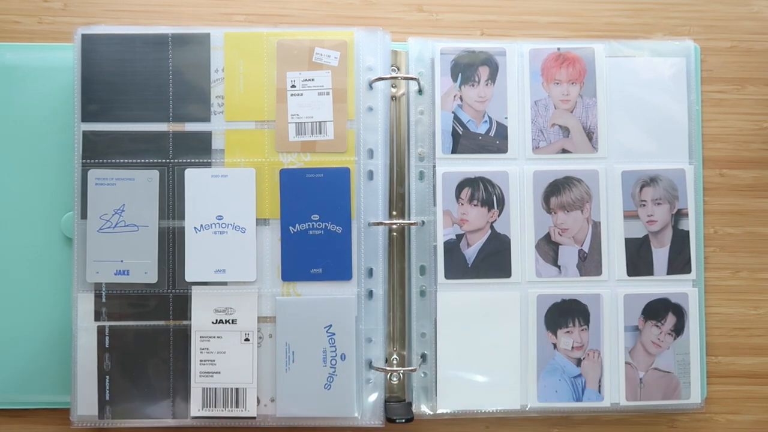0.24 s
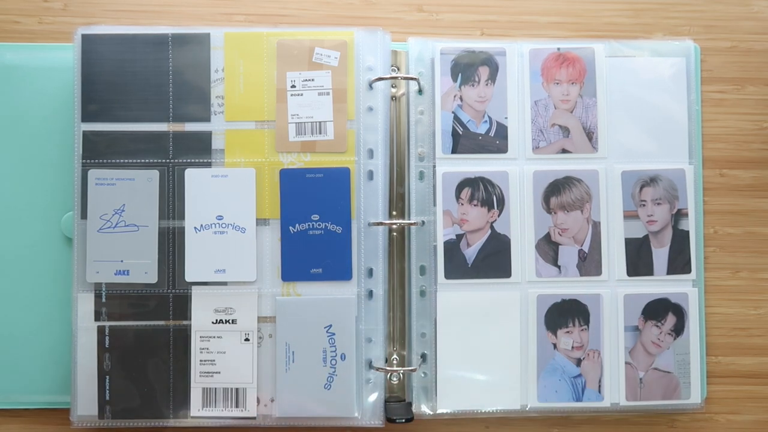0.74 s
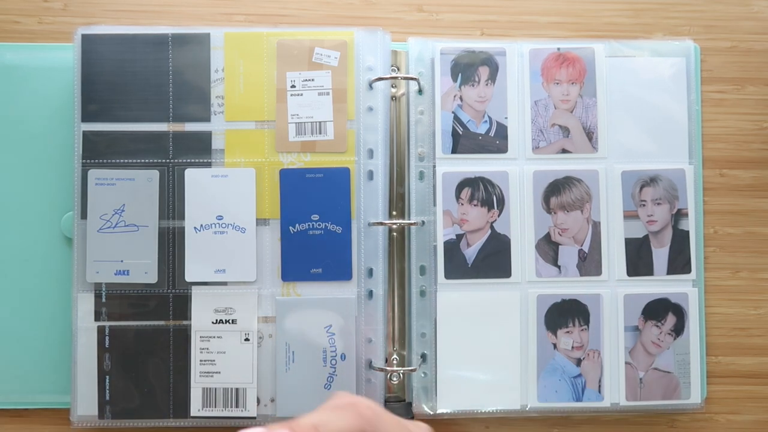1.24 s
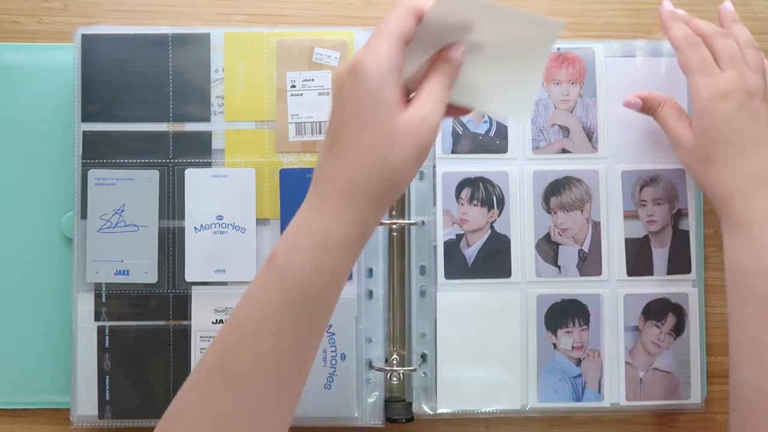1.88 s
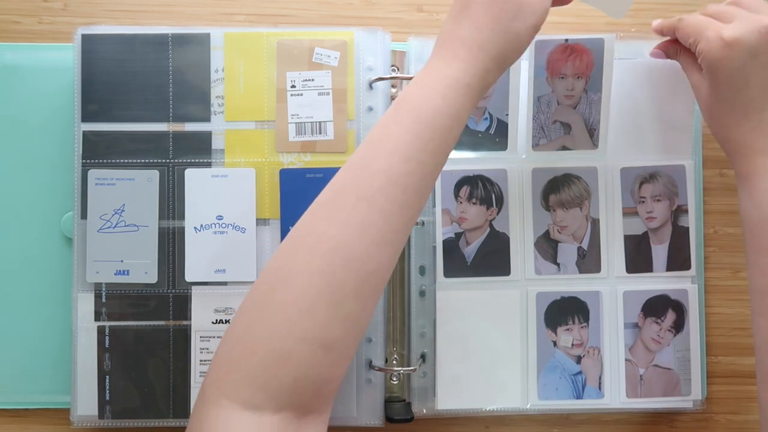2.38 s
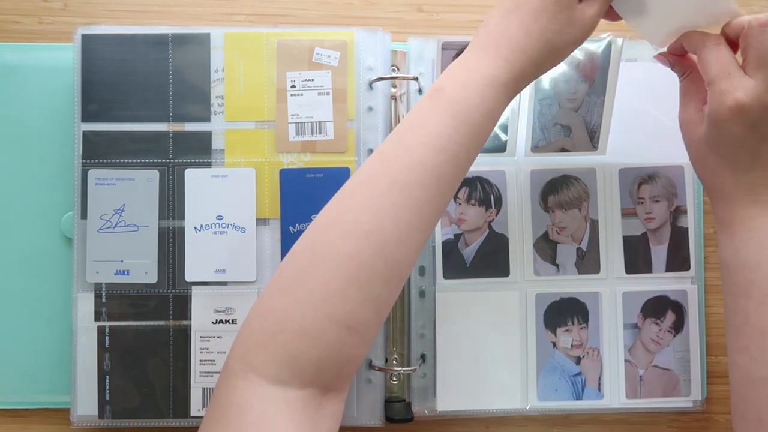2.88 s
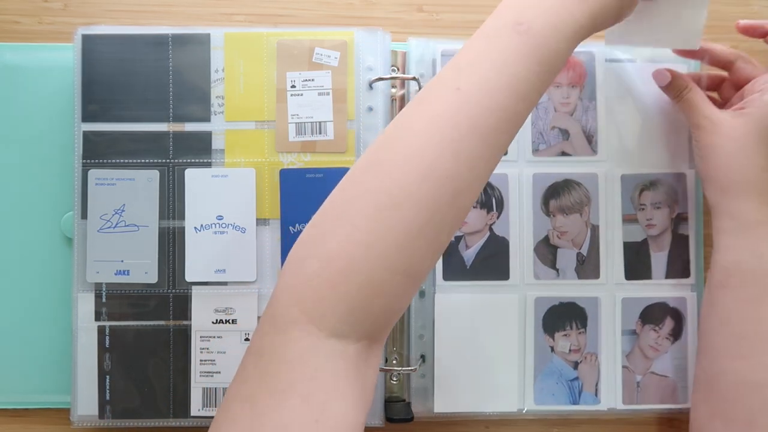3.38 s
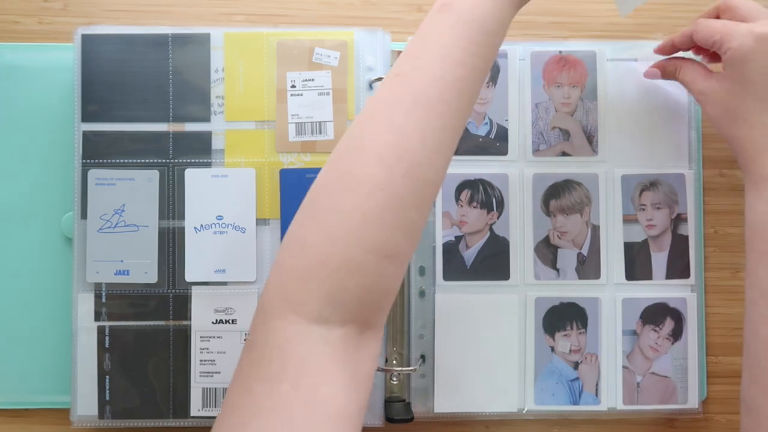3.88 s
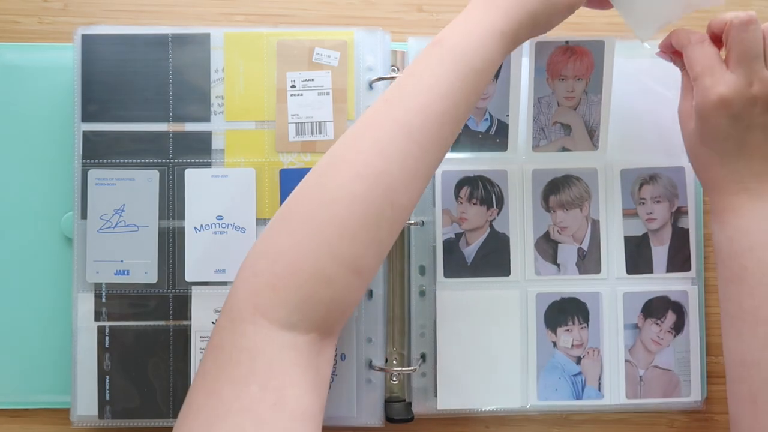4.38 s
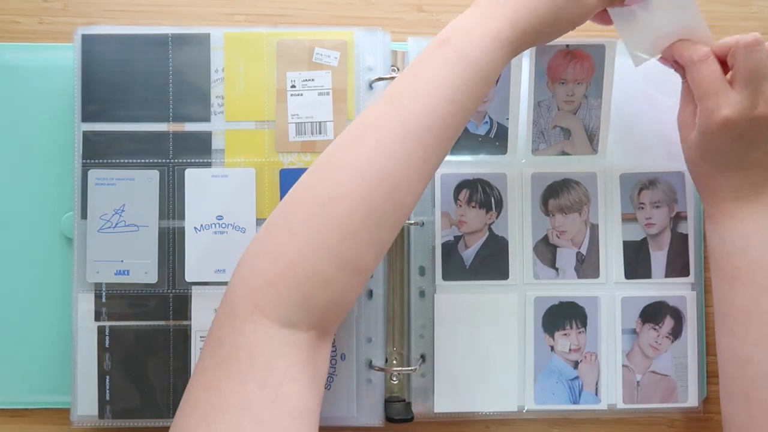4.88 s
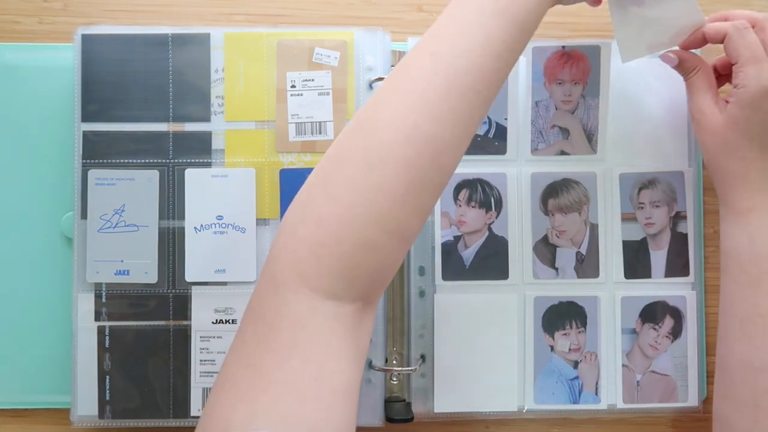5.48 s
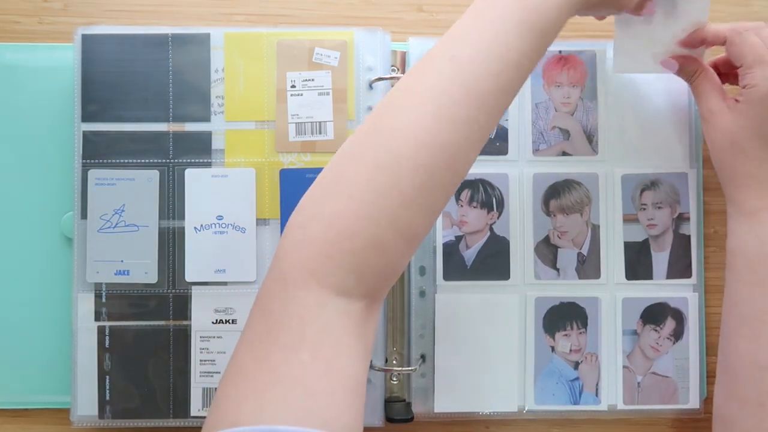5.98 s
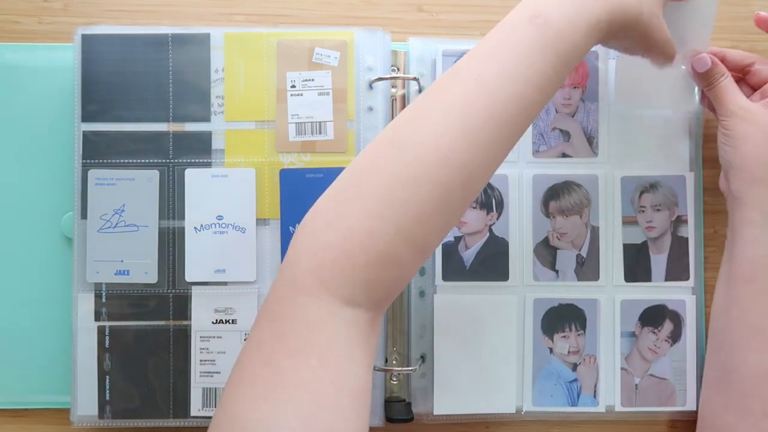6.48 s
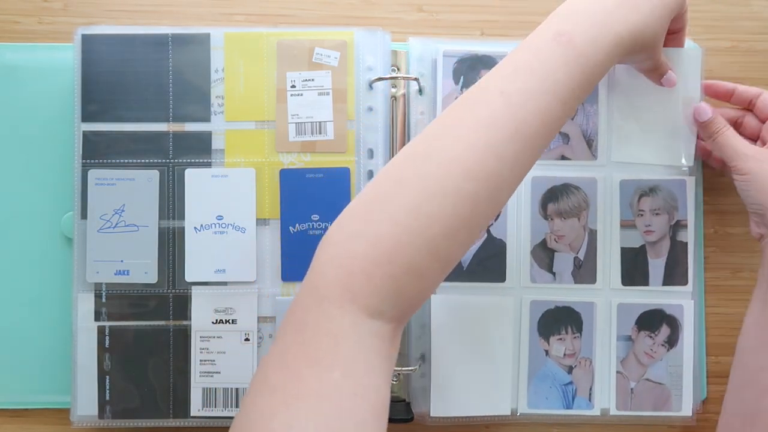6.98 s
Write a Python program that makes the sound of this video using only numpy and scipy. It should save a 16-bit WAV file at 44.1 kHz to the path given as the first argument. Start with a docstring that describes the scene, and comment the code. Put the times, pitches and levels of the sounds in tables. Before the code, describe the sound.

Thin plastic binder pages crackle busily up close, then a card slips into a pocket with sparse snaps, ticks and soft rustles.

```python
"""Clear plastic pages handled on a desk

A sleeve of a plastic binder page crinkles close to a phone, then a card is worked into a pocket.
Creases release as impulses that ring film panels, filtered impulse trains make the crackle and sliding hiss,
and larger buckles are short decaying tones with noise. The desk booms, a small room answers with decaying
noise, and an appliance hums far off as narrow noise bands under steady air noise."""
import sys
import numpy as np
from scipy import signal
from scipy.fft import rfft, irfft, next_fast_len
from scipy.io import wavfile
from scipy.ndimage import uniform_filter1d, map_coordinates

SR = 44100
rng = np.random.default_rng(int(sys.argv[2]) if len(sys.argv) > 2 else 0)


def wrap_up_sound(samples):
    """Save the sound to the file named by the first command line argument, as 16-bit audio."""
    columns = np.atleast_2d(samples).T
    # keep every value between -1 and 1, then stretch to whole-number steps
    tamed = np.clip(columns, -1, 1)
    steps = np.round(tamed * 32767).astype(np.int16)
    wavfile.write(sys.argv[1], SR, steps)


N = 319284  # length in samples

# Rustles, one pull or push of the film each. Each row: peak time in seconds, rise in seconds,
# fall in seconds, then relative levels of crackle, sliding hiss and page flex in dB.
RUSTLES = [(0.081, 0.0075, 0.076, -33.5, -65, -31), (.23, 0.11, 0.085, -45.5, -73, -52),
           (.339, 0.02, 0.15, -28.5, -57, -38), (.4, 0.099, 0.097, -50, -44.5, -42),
           (.47, 0.037, 0.082, -31, -47, -28.5), (0.607, 0.014, 0.023, -35.5, -64, -41),
           (0.863, 0.11, 0.16, -27.5, -41, -45), (.9, 0.052, 0.047, -32, -59, -49),
           (0.992, 0.075, 0.059, -21.5, -32.5, -38.5), (1.09, 0.024, 0.033, -39.5, -48, -45),
           (1.2, 0.0057, 0.048, -38, -40, -53), (1.247, 0.033, 0.051, -49, -58, -29),
           (2.17, 0.17, 0.047, -51, -54, -54), (2.3, 0.027, 0.066, -58, -56, -67),
           (2.359, 0.032, 0.14, -43.5, -47, -54.5), (2.49, 0.07, 0.052, -48.5, -46.5, -54),
           (2.63, 0.091, 0.15, -53.5, -61, -60), (3.018, 0.081, 0.081, -47, -56.5, -50.5),
           (3.333, 0.027, 0.06, -32.5, -46.5, -38), (3.41, .1, 0.072, -52, -66, -59.5),
           (3.55, 0.044, 0.064, -36.5, -41.5, -39.5), (4.11, 0.23, 0.11, -50.5, -55.5, -62),
           (4.329, 0.038, 0.054, -45.5, -47, -48), (4.585, 0.049, 0.1, -48.5, -60, -66),
           (4.66, 0.048, 0.043, -56, -54.5, -68), (4.93, 0.057, 0.11, -43.5, -53.5, -69),
           (5.08, 0.098, 0.12, -49.5, -79, -58), (6.055, 0.071, 0.087, -44, -48, -66),
           (6.175, 0.023, 0.24, -42.5, -75, -51), (6.42, 0.25, 0.27, -54, -70, -55),
           (6.67, 0.19, 0.11, -46.5, -54.5, -53), (6.78, 0.046, 0.25, -46.5, -49.5, -62),
           (7.04, 0.1, 0.19, -51, -51, -59)]
SWING_DB = 20  # a rustle climbs this far in its rise time and sinks this far in its fall time
# How busy the fingers are between rustles; low while the card is held still, high while it slides in.
# Each row: time in seconds, relative crackle level in dB.
BUSY = [(0, -58), (.06, -59), (.25, -60), (.7, -48), (1.17, -61), (1.42, -63.5), (1.7, -55), (2.2, -59.5),
        (2.9, -60), (3.2, -54), (3.7, -53.5), (4.2, -60), (4.85, -61), (5.2, -56), (5.5, -57),
        (5.91, -60.5), (6.2, -48.5), (6.6, -49), (6.92, -62), (7.24, -61.5)]
QUIET_DB = -60  # reference crackle level
BUSY_HISS_DB, BUSY_FLEX_DB = -68, -66.5  # hiss and flex when the crackle is at the reference
HISS_GROWS, FLEX_GROWS = 0.84, 0.99  # dB gained for each dB of crackle

# Panels of the film that ring when a crease gives way.
# Each row: frequency in Hz, bandwidth in Hz, relative level in dB.
PANELS = [(470, 170, -17), (921, 74, 0), (1280, 200, -7), (1643, 130, -5), (1966, 150, -4),
          (2150, 140, -6.5), (3040, 230, -18)]
# The pitch that the bent film favours; panels near it or near the upper ring sound loudest.
# Each row: time in seconds, pitch in Hz.
FAVOURED_PITCH = [(0, 980), (.52, 980), (.7, 1410), (.8, 1360), (.9, 1230), (.97, 1090), (1.0, 1530),
                  (1.03, 1870), (1.07, 1790), (1.15, 1080), (1.35, 1080), (1.7, 1720), (3.0, 1480),
                  (3.5, 1020), (4.0, 1480), (6.2, 1590), (7.24, 1800)]
UPPER_HZ, UPPER_DB = 2370, -11.5  # the upper ring and its relative level
FOCUS_DB = 45  # loss one octave off, before the limit

# Single buckles and taps. Each row: start in seconds, relative level in dB, nominal pitch in Hz,
# relative bright crack level in dB, relative desk knock level in dB, length scale in cycles.
SNAPS = [(0.073, -32, 2120, -36, -45, 2.9), (0.0755, -25.5, 2000, -50, -24.5, 5.4),
         (0.086, -19, 1210, -45, -26, 2.2), (0.154, -33.5, 2140, -51, -47, 8.1),
         (0.302, -26.5, 2120, -51, -29, 20), (0.303, -24.5, 960, -63, -43, 5.7),
         (0.332, -25, 2170, -41, -34, 9), (0.334, -24.5, 1000, -55, -27, 8),
         (0.345, -23, 1010, -39, -41, 3.7), (0.368, -25, 910, -41, -31, 8.4),
         (0.388, -20.5, 1410, -33.5, -20.5, 9), (0.35, -24, 1010, -50, -43, 7),
         (0.407, -22.5, 970, -39, -38, 2.3), (0.415, -32, 1300, -38, -45, 3),
         (0.46, -24, 1490, -43, -48, 5.1), (0.4645, -23, 920, -49, -41, 7.1),
         (0.477, -24.5, 945, -35.5, -36, 8.7), (0.491, -27, 1170, -39, -44, 4),
         (0.4925, -16, 1340, -41, -41, 5.3), (0.496, -23.5, 904, -53, -28, 6.3),
         (0.526, -32, 1000, -52, -45, 5), (0.548, -32.5, 1370, -46, -52, 5.9),
         (0.601, -28.5, 2250, -41, -41, 4), (0.614, -36, 1420, -60, -53, 8),
         (0.6525, -32, 1400, -47.5, -59, 7.6), (0.693, -32, 1460, -46, -55, 13),
         (0.757, -40, 1590, -60, -40, 10), (0.829, -21.5, 1295, -60, -47, 13),
         (0.852, -25, 2360, -52, -52, 7.6), (0.857, -26, 1330, -41, -46, 8.3),
         (0.861, -23, 2243, -50, -52, 20), (0.868, -24, 2250, -40, -55, 18),
         (0.869, -23, 1268, -35, -53, 11.5), (0.887, -22, 1290, -43, -55, 7.3),
         (0.894, -27, 1250, -36, -33, 6), (0.895, -26, 2230, -50, -50, 13), (0.91, -26, 1220, -54, -49, 3),
         (0.91, -25, 2230, -54, -55, 14), (0.953, -25, 1010, -45, -45, 5), (0.982, -26, 1200, -45, -48, 4),
         (0.971, -23, 1052, -34, -43, 9), (0.991, -25, 1540, -29.5, -37, 11),
         (1.018, -24, 1830, -33.5, -50, 18), (1.062, -24.5, 970, -61, -31, 4.8),
         (1.068, -26.5, 580, -62, -40, 2.5), (1.205, -20, 993, -51, -31, 5.7),
         (1.24, -25, 1140, -33, -52, 2.4), (1.242, -17, 1104, -53, -25.5, 8.7),
         (1.243, -17.5, 2160, -58, -46, 13.8), (1.255, -23, 1060, -55, -42, 5),
         (1.271, -25, 1080, -62, -23, 8.9), (1.288, -21.5, 1470, -43.5, -58, 1.6),
         (1.613, -22, 1910, -34.5, -29, 2.4), (1.6253, -17.5, 1940, -41, -28, 1.7),
         (1.6274, -18.5, 1340, -59, -24.5, 1.6), (1.6297, -20.5, 1370, -54, -25.5, 1.7),
         (1.7291, -19, 920, -50, -34, 1.3), (2.165, -24.5, 1820, -43, -64, 0.44),
         (2.293, -61, 2490, -46, -55, 3), (2.483, -29.5, 1930, -42, -39, 0.95),
         (2.654, -38, 2300, -51, -53, 2.1), (3.075, -36, 824, -69, -36, 5.6),
         (3.1198, -17.5, 2280, -70, -25, 8.7), (3.123, -20, 1800, -70, -43, 5.8),
         (3.132, -34, 2070, -70, -53, 9.8), (3.142, -36, 2230, -70, -53, 6),
         (3.199, -34, 885, -69, -36, 3.4), (3.225, -34.5, 890, -47.5, -37.5, 6.4),
         (3.329, -24.5, 1160, -46, -26.5, 2.2), (3.336, -24.5, 1050, -55, -45, 4),
         (3.366, -34, 2000, -43, -40, 4), (3.3787, -34, 3600, -35.5, -52, 3.3),
         (3.4225, -31, 1690, -43.5, -62, 1.5), (3.518, -36, 935, -44, -56, 5.2),
         (3.544, -22.5, 930, -28, -43, 11), (3.556, -25, 1077, -42, -45, 8),
         (3.779, -41, 816, -72, -31.5, 9.8), (4.098, -35, 1170, -55, -45, 2.7),
         (4.327, -33, 1370, -59, -53, 1.2), (5.1996, -13.5, 1560, -34, -30, 1.96),
         (5.284, -33, 866, -55, -48, 3.8), (5.402, -34, 1200, -69, -43, 1.1),
         (5.4146, -14, 1220, -43, -40, 1.4), (5.559, -41, 1760, -55.5, -49, 8.8),
         (5.74, -40, 3000, -42.5, -58, 2), (5.743, -18.5, 1370, -33.5, -44, 1.8),
         (5.827, -24, 850, -69, -32.5, 2.2), (6.095, -28.5, 1700, -62, -32, 3),
         (6.127, -31.5, 2000, -55, -48, 0.62), (6.159, -33.5, 900, -69, -29.5, 1.6),
         (6.6396, -24, 2250, -55, -42, 2.3), (6.666, -26.5, 890, -62, -33, 0.54),
         (6.71, -22, 1900, -38.5, -62, 1.8), (6.712, -24.5, 2700, -60, -62, 8),
         (6.724, -27, 2200, -41, -35, 4), (6.772, -25, 1400, -66, -50, 1.2),
         (6.818, -26, 1140, -46, -59, 1.9), (6.8846, -22, 1740, -66, -36, 1.2),
         (7.005, -16, 2070, -37.5, -39, 0.72), (7.138, -41, 2390, -48, -61, 2.5)]
# Spectrum of the film's rattle. Each row: frequency in Hz, relative density in dB per Hz.
FILM = [(240, -34), (420, 2.5), (720, -2.5), (1000, -0.5), (1600, -4.5), (2250, -7.5), (2700, -7.5),
        (4200, -15.5), (6000, -43.5)]
# Spectrum of sliding hiss and bright cracks. Each row: frequency in Hz, relative density in dB per Hz.
SLIDE = [(1470, -19), (2500, -4.5), (3380, -7), (5030, -9.5), (8660, -20), (12700, -26), (15600, -45),
         (16000, -100)]
# Spectrum of page flex and desk knocks. Each row: frequency in Hz, relative density in dB per Hz.
FLEX = [(90, -51.5), (180, 7), (300, 10.5), (550, 7), (900, -45)]

# Booms of the desk top. Each row: start in seconds, relative level in dB, frequency in Hz.
THUMPS = [(0.076, -32.5, 116), (1.244, -26, 235), (3.328, -38.5, 207), (3.542, -32, 201),
          (5.74, -37.5, 199)]
# A resonance between desk and phone lifts this band and dulls what lies just above.
GAP_HZ, GAP_WIDTH_HZ, GAP_GAIN = 2343, 350, 0.31

# Where the hands are. Each row: time in seconds, lead from -1 (right port first) to 1 (left port first),
# level of left over right in dB.
PLACE = [(0, -0.49, -1), (1.5, -0.41, -1), (2.2, 0.52, 1), (5.2, 0.59, 1.5), (7.24, 0.49, 1)]
# What differs between the two ports. Each row: frequency in Hz, level in dB against what they share.
PORT_SIDE = [(60, -44), (150, -22), (380, -26), (950, -17.5), (2380, -10.5), (5980, 1.5), (15000, 12.5)]

# Reverberation. Each row: frequency in Hz, 60 dB decay time in seconds.
ROOM_DECAY = [(200, 0.17), (1500, 0.24), (5000, 0.24), (12000, 0.4)]
# Stereo reverberation. Each row: frequency in Hz, left-right likeness (clipped to -1..1).
ROOM_ALIKE = [(100, 1), (400, 0.98), (1500, 1), (4000, 0.51), (8000, 0.31), (13000, -1.2)]

# Spectrum of the room tone. Each row: frequency in Hz, relative density in dB per Hz.
AIR = [(12, -50), (20, -21), (60, -1.5), (113, -5.5), (222, -11.5), (367, -10.5), (527, -17), (802, -18.5),
       (1480, -22.5), (4940, -28.5), (10200, -40), (12100, -43), (13200, -40), (14300, -80), (16000, -76)]
AIR_DB = -58.5  # rms of the left-right mean above 200 Hz
# Stereo room tone. Each row: frequency in Hz, left-right likeness.
AIR_ALIKE = [(110, 0.995), (180, 0.56), (550, -0.49), (1650, -0.52), (4970, -0.57), (15000, 0.44)]
# Wavering hum lines. Each row: frequency in Hz, width in Hz, rms level in dB.
HUM = [(56.1, 9, -54.5), (112.9, 6.5, -56), (169.9, 6.2, -62)]
TOP_HZ = 15700  # upper limit of the sound's band


def handling():
    """Impulsive excitation of resonators: creases ping panels over a fine rattle, hiss and page flex."""
    steady, (film_gain, slide_gain, flex_gain) = effort()
    favoured_hz, = curves(FAVOURED_PITCH)

    def off(hz, pitch):
        return -FOCUS_DB * np.log2(hz / pitch) ** 2

    def focus(hz):
        nearest_db = np.maximum(off(hz, favoured_hz), UPPER_DB + off(hz, UPPER_HZ))
        return amp(nearest_db.clip(-12, 0))

    pings = np.zeros(N)
    for hz, width, db in PANELS:
        creases = kicks(share=.025, spike_db=2.5, clump_db=3.5)
        pings += amp(db) * focus(hz) * unit(filtered(creases, resonance(hz, width)))
    film = unit(pings) + amp(-4) * crackle(FILM, share=0.06, spike_db=3.5, clump_db=3.0)
    slide = crackle(SLIDE, share=.12, spike_db=2.6, clump_db=1.8)
    flex = amp(-4.0) * flex_gain * crackle(FLEX, share=0.085, spike_db=4.5, clump_db=3.5)

    # finely rubbing fingers, heard between the rustles
    fine = np.zeros(N)
    for gain, colour in zip(steady[::2], (FILM, FLEX)):
        fine += gain * crackle(colour, share=.3, spike_db=2.0, clump_db=0.9)
    rubbing = patchy(fine, depth_db=5.0) * np.std(fine)
    hiss = np.hypot(slide_gain, steady[1]) * patchy(slide, depth_db=1.8)
    return amp(-3.5) * (film_gain * patchy(film, depth_db=0.5) + rubbing) + hiss + flex


def effort():
    """Exponential growth and decay: gains of crackle, hiss and flex for fine rubbing and for rustles."""
    busy_db, = curves(BUSY)
    over = busy_db - QUIET_DB
    steady = amp([busy_db, BUSY_HISS_DB + HISS_GROWS * over, BUSY_FLEX_DB + FLEX_GROWS * over])
    power = np.zeros((3, N))
    for s, rise, fall, *peak_db in RUSTLES:
        first = max(0, round((s - 2 * rise) * SR))
        last = min(N, round((s + 2 * fall) * SR))
        t = np.arange(first, last) / SR - s
        drop_db = SWING_DB * np.maximum(-t / rise, t / fall)
        power[:, first:last] += amp(np.c_[peak_db] - drop_db) ** 2  # overlapping rustles add in power
    return steady, np.sqrt(power)


def snaps():
    """Snap-through buckling: a few cycles of tone with film rattle, a short bright crack and a dull knock."""
    out, t = np.zeros(N + SR), np.arange(SR // 12) / SR
    film, bright, dull = causal(FILM), causal(SLIDE), causal(FLEX)
    for s, db, hz, crack_db, knock_db, cycles in SNAPS:
        noise = rng.standard_normal((2, len(t)))
        u = t * hz / max(cycles, .5) * 3.76
        swell = u * np.exp(1 - u)  # a longer buckle starts more softly
        glide = 1.04 - .02 * u.clip(0, 4)  # a slight downward glide; the pitch stays nearly steady
        phase = 2 * np.pi * hz * np.cumsum(glide) / SR

        pop = np.zeros(len(t))
        for k in range(1, 4):  # harmonics take the film's colour, with a steep loss above 3400 Hz
            harmonic_db = along(FILM, k * hz) - along(FILM, hz) - 8.9 * (k - 1.5)
            pop += swell * amp(harmonic_db) * np.sin(k * phase) / (1 + (k * hz / 3400) ** 8)

        ring = resonance(np.sqrt(hz * 1900), 2200)
        film_noise = np.convolve(noise[0], film)[:len(t)]
        near = unit(filtered(film_noise, lambda f: ring(f) ** 2))
        rattle = amp(-8.5) * (swell + 0.99 * u.clip(0, 1) * amp(-60 * t / 0.063)) * near

        decay = amp(-60 * t / 0.0069) + 0.15 * amp(-60 * t / 0.18)  # 60 dB decays in seconds
        onset = (t / 0.00097).clip(0, 1)
        crack = decay * onset * unit(np.convolve(noise[1], bright)[:len(t)])

        sound = amp(db - 6.5) * (pop + rattle) + amp(crack_db + 7.5) * crack
        sound[:len(dull)] += amp(knock_db - 2.0) * dull + amp(crack_db + 11.5) * bright
        out[round(s * SR):][:len(t)] += sound
    return out[:N]


def desk():
    """Damped modes of a plate: firm presses set the desk top booming at two frequencies."""
    out, t = np.zeros(N + SR), np.arange(SR // 6) / SR
    for s, db, hz in THUMPS:
        boom = np.sin(2 * np.pi * hz * t) + 0.7 * np.sin(2 * np.pi * hz * 0.577 * t)
        out[round(s * SR):][:len(t)] += amp(db - 60 * t / 0.11) * boom
    return out[:N]


def gap(f):
    """Interference of a direct path with a resonant one, in the gap between desk and phone."""
    return 1 + GAP_GAIN * GAP_HZ * GAP_WIDTH_HZ / (GAP_HZ ** 2 - f * f + 1j * f * GAP_WIDTH_HZ)


def ports(x):
    """Pressure gradient: close ports share the pressure; their difference is a quarter cycle off."""
    lead, pan_db = curves(PLACE)
    moving = lead * (1 + 0.9 * wobble(120)) * x
    side = filtered(moving, lambda hz: 1j * amp(along(PORT_SIDE, hz)))
    return np.array([(x + side) * amp(pan_db / 2), (x - side) * amp(-pan_db / 2)])


def room(x):
    """Frequency-dependent reverberation: sound convolved with decaying noise, a new tail each 1/6 s."""
    out, step = np.zeros((2, N + SR)), SR // 6
    delay = 130  # samples before the tail begins
    for start in range(0, N, step):
        hz, t, z = signal.stft(rng.standard_normal((2, SR // 4)), SR, nperseg=256)
        decay = amp(-60 * t / along(ROOM_DECAY, hz)[:, None])
        tail = signal.istft(z * decay, SR, nperseg=256)[1]
        wet = signal.fftconvolve(x[None, start:start + step], tail / np.linalg.norm(tail[0]), axes=1)
        out[:, start + delay:start + delay + wet.shape[1]] += wet
    return paired(out[:, :N], [(100, 0)], ROOM_ALIKE)  # flat colour


def room_tone():
    """Stationary noise: air and microphone hiss, with the narrow wavering lines of a far motor."""
    air = paired(rng.standard_normal((2, N)), AIR, AIR_ALIKE)
    air = air / np.std(filtered(air.mean(0), lambda hz: hz > 200))
    hum = np.zeros(N)
    for hz, width, db in HUM:
        line = filtered(rng.standard_normal(N), lambda f: np.exp(-((f - hz) / width) ** 2))
        hum += amp(db) * unit(line)
    return amp(AIR_DB) * air + hum


def kicks(share, spike_db, clump_db):
    """Random impulses: tiny buckles on a share of the samples, a few much larger, in clumps."""
    u = rng.random((3, N))
    size_db = -spike_db * np.log(1 - .99 * u[2]) + clump_db * wobble(70)
    return (u[0] < share) * np.sign(u[1] - .5) * amp(size_db)


def crackle(spectrum, share, spike_db, clump_db):
    """Source and filter: buckles coloured by one spectrum, at rms 1."""
    return unit(signal.fftconvolve(kicks(share, spike_db, clump_db), causal(spectrum))[:N])


def patchy(x, depth_db):
    """Time-varying colour as the film bends: random gain patches of about 700 Hz by 35 ms, at rms 1."""
    z = signal.stft(x, nperseg=256)[2]
    field = uniform_filter1d(rng.standard_normal(z.shape), size=4, axis=0)
    field = uniform_filter1d(field, size=12, axis=1)
    return unit(signal.istft(z * amp(depth_db * unit(field)), nperseg=256)[1][:N])


def resonance(hz, width):
    """The damped oscillator: a causal resonance whose gain is 1 at its centre."""
    return lambda f: 1j * f * width / (hz * hz - f * f + 1j * f * width)


def causal(spectrum, size=1024):
    """Minimum phase: the folded cepstrum of a spectrum gives its causal pulse, scaled to peak 1."""
    magnitude = amp(along(spectrum, np.fft.rfftfreq(2 * size, 1 / SR)))
    ceps = irfft(np.log(magnitude + 1e-4))
    ceps[1:size] *= 2
    ceps[size + 1:] = 0
    pulse = irfft(np.exp(rfft(ceps)))[:size]
    return pulse / np.abs(pulse).max()


def paired(two, spectrum, alike):
    """Interchannel coherence: two unrelated signals, mixed to left and right as alike as asked."""
    def response(hz):
        turn = np.arccos(np.clip(along(alike, hz), -1, 1)) / 2
        return amp(along(spectrum, hz)) * [np.cos(turn), np.sin(turn)]

    mid, side = filtered(two, response)
    return np.array([mid + side, mid - side])


def filtered(x, response):
    """Linear filtering: the spectrum of x times a response of frequency."""
    m = next_fast_len(x.shape[-1] + 8192)
    return irfft(rfft(x, m) * response(np.fft.rfftfreq(m, 1 / SR)), m)[..., :x.shape[-1]]


def wobble(rate):
    """Slow random modulation: a smooth curve through random knots, rate knots a second."""
    return map_coordinates(rng.standard_normal(int(N * rate / SR) + 4), [np.arange(N) * rate / SR])


def curves(rows):
    """Linear interpolation in time: one value per sample for each column after the time."""
    s, *cols = np.transpose(rows)
    return [np.interp(np.arange(N) / SR, s, c) for c in cols]


def along(points, hz):
    """Interpolation of (Hz, value) points on a logarithmic frequency axis."""
    f, v = np.transpose(points)
    return np.interp(np.log(hz + 1), np.log(f + 1), v)


def amp(db):
    """The decibel: level to amplitude ratio."""
    return 10 ** (np.asarray(db) / 20)


def unit(x):
    """Normalisation to rms 1."""
    return x / np.sqrt(np.mean(x ** 2) + 1e-20)


def scene():
    """Superposition: direct sound of the hands, its reverberation and the room tone."""
    hands = filtered(handling() + snaps() + desk(), gap)
    return amp(-0.5) * ports(hands) + amp(-6.5) * room(hands) + room_tone()


def record(dry):
    """Band limiting: nothing sounds above TOP_HZ."""
    return filtered(dry, lambda hz: hz < TOP_HZ)


dry = scene()
out = record(dry)
wrap_up_sound(out)
```